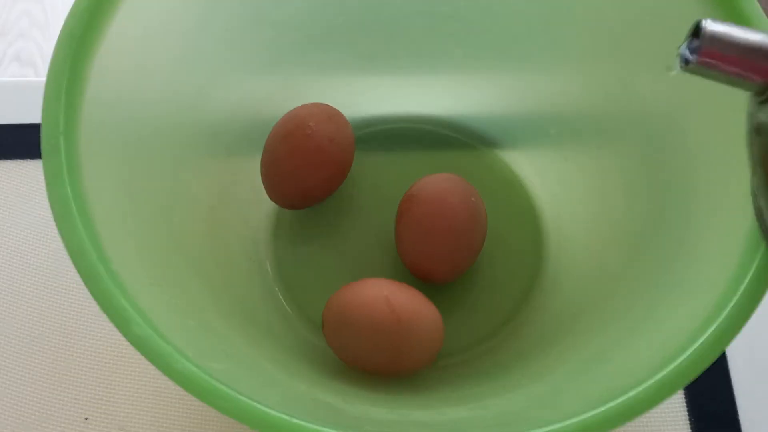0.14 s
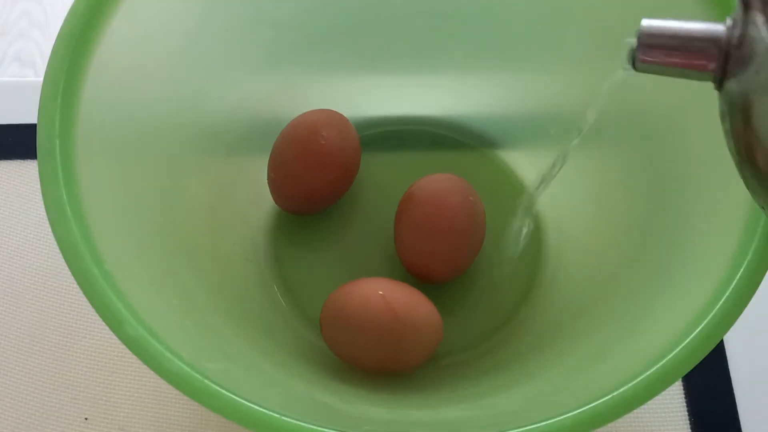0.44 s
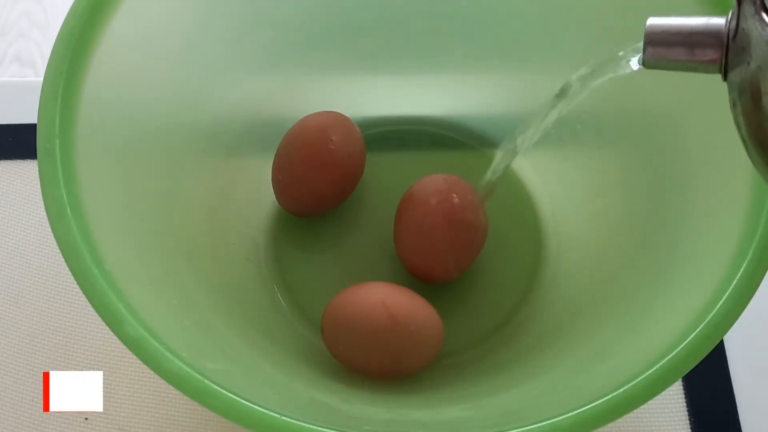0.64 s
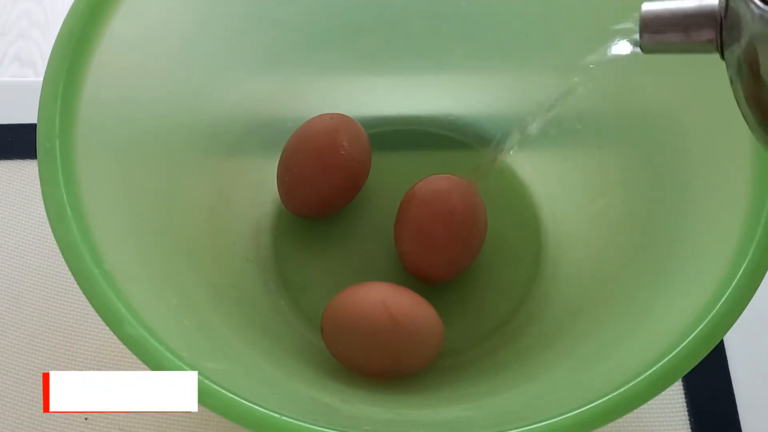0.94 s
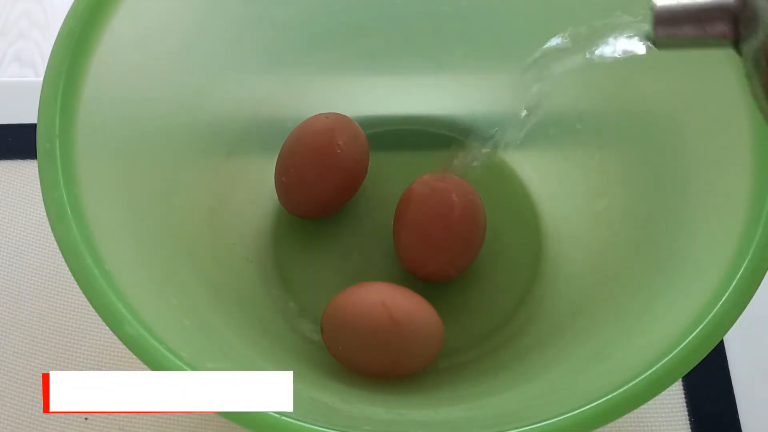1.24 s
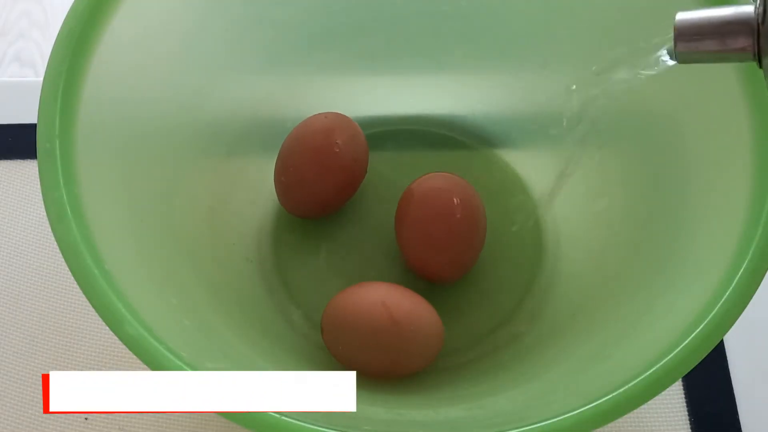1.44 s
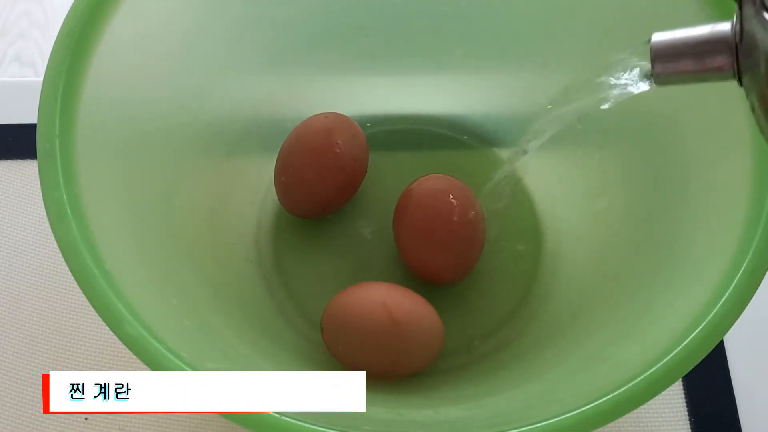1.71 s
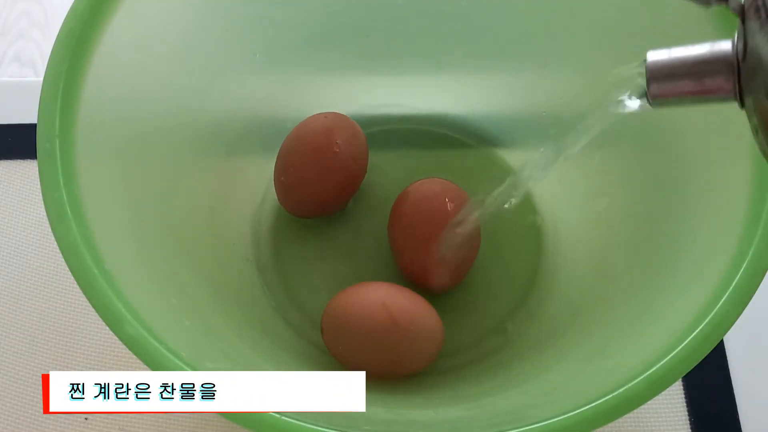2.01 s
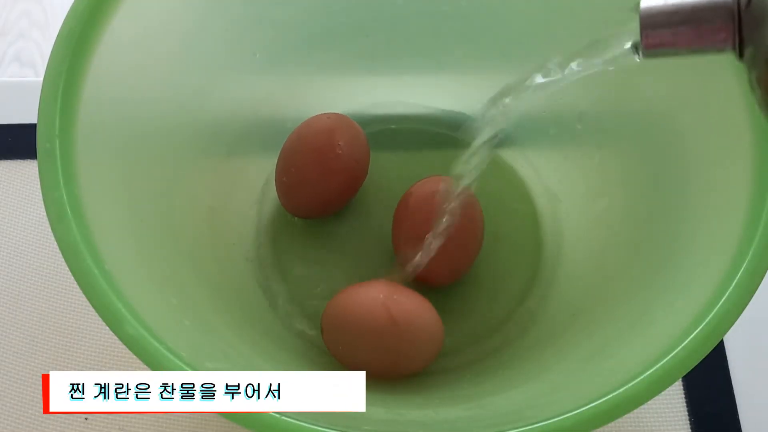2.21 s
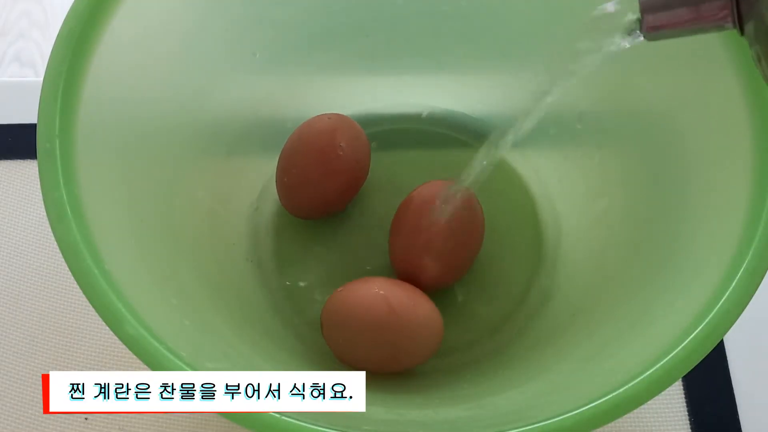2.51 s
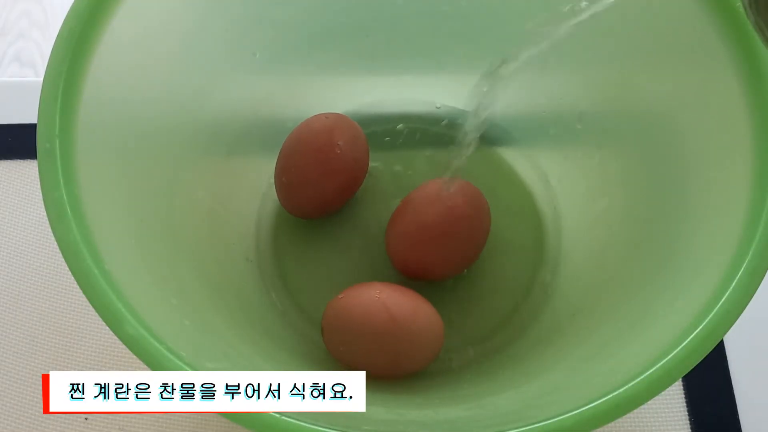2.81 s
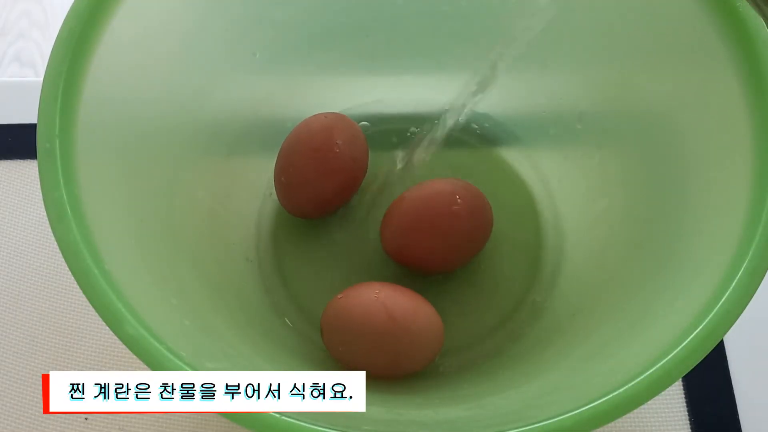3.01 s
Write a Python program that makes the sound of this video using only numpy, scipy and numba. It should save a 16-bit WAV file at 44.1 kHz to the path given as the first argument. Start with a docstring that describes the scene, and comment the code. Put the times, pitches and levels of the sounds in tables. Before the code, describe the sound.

After a short hard bowl knock, a thin stream of water starts, slapping eggs and plastic, with droplets, hiss and hollow bottle gulps, recorded close in a small kitchen with faint hum.

```python
"""A bowl is knocked and rattles on the counter, exciting its modes, and a low thud follows as it settles.
Then cold water is poured over eggs in the bowl: air entering the bottle gulps and glugs as rising sines.
Lumps of water slap eggs and bowl as rings with noise, droplets ring briefly and fine spray hisses between.
The pool starts to slosh as low noise. Reflections of a quiet kitchen and its hum lie under everything."""
import sys
import numpy as np
from scipy import signal
from scipy.fft import rfft, irfft
from scipy.io import wavfile
from scipy.ndimage import uniform_filter1d
from numba import njit

SR = 44100
rng = np.random.default_rng(int(sys.argv[2]) if len(sys.argv) > 2 else 0)


def digitize_waveform(pressure):
    """Quantize a signal to 16-bit integers and store it at the path in sys.argv[1].

    Rows of a 2-D input are taken as channels; values are limited to [-1, 1].
    """
    field = np.atleast_2d(pressure).T
    bounded = np.clip(field, -1, 1)
    quanta = np.round(bounded * 32767).astype(np.int16)
    wavfile.write(sys.argv[1], SR, quanta)


def ratio_of_db(decibels):
    """Turn decibels (scalar or array-like) into linear amplitude factors; 0 dB maps to 1."""
    return 10 ** (np.asarray(decibels, float) / 20)


N = 138915  # samples

# Lumps of water landing. Each row: start in seconds, level in dB, ring pitch in Hz.
SLAP_EVENTS = [(0.5342, -46, 6450), (0.681, -36.5, 2680), (0.7658, -29, 2330), (0.7795, -27, 2380),
               (1.0525, -33.5, 6470), (1.0823, -31.5, 2400), (1.258, -36.5, 3540), (1.265, -35.5, 1990),
               (1.3433, -36, 2930), (1.4204, -32.5, 6200), (1.7294, -30, 6500), (1.8892, -24, 2620),
               (1.9461, -23.5, 6170), (1.9615, -35.5, 6250), (2.0464, -26, 5800), (2.1255, -38, 2760),
               (2.163, -37.5, 2170), (2.242, -33.5, 2670), (2.2707, -31, 2830), (2.3005, -31.5, 5660),
               (2.3257, -34, 1560), (2.3519, -36.5, 2880), (2.449, -29, 2450), (2.4789, -30, 12900),
               (2.513, -39, 6300), (2.5262, -29, 3730), (2.588, -34.5, 6600), (2.62, -34, 6600),
               (2.6265, -27, 4350), (2.655, -29, 6350), (2.7082, -24.5, 2630), (2.7568, -20, 1976),
               (2.8578, -27, 6340), (2.887, -33.5, 6400), (2.9594, -24, 13000), (3.001, -35, 2950),
               (3.082, -40, 6670)]
# Flow of the stream. Each row: time in seconds, relative spray level in dB.
SPRAY_FLOW = [(.53, -73), (.6, -64.5), (.72, -54.5), (1.02, -65.5), (1.16, -51), (1.22, -61), (1.29, -47.5),
              (1.4, -62.5), (1.452, -50.5), (1.68, -58), (1.72, -47.5), (2.06, -51), (2.22, -64.5),
              (2.32, -52), (2.43, -57.5), (2.7, -52), (2.97, -50), (3.06, -51)]
# Spectrum of the spray. Each row: frequency in Hz, relative level in dB.
SPRAY_SPECTRUM = [(1300, 0.5), (2930, 8.5), (5200, 6), (6620, 13), (7400, -0.5), (9000, -65)]
# Spectrum of the treble of the spray. Each row: frequency in Hz, relative level in dB.
TREBLE_SPECTRUM = [(6800, -22), (7800, 10), (13000, 17), (15300, 10.5)]
# Treble against the spray. Each row: time in seconds, relative level in dB.
TREBLE_LEVEL = [(.6, -16), (1.35, -2.5), (1.9, -8)]
# Spectrum of the sloshing pool. Each row: frequency in Hz, relative level in dB.
SLOSH_SPECTRUM = [(35, -31), (80, 0), (220, -20), (400, 7), (886, -12), (2500, -27)]
# Bubbles of air bursting into the bottle. Each row: start in seconds, level in dB, pitch in Hz.
GLUG_EVENTS = [(0.645, -42.5, 917), (0.68, -44.5, 970), (0.691, -37, 1053), (0.809, -38.5, 1010),
               (0.924, -29.5, 1180), (0.999, -47, 658), (1.279, -52, 1050), (1.366, -41, 1080),
               (1.496, -31.5, 960), (1.581, -32.5, 1380), (1.608, -28.5, 1070), (1.695, -29.5, 1170),
               (1.74, -33.5, 1337), (1.791, -39.5, 860), (1.851, -41, 698), (2.011, -28.5, 1074),
               (2.122, -37.5, 930), (2.135, -35, 1006), (2.252, -34, 994), (2.388, -42, 740),
               (2.489, -34.5, 940), (2.595, -48, 710), (2.611, -41, 900), (2.73, -33, 860),
               (2.938, -39.5, 714), (2.989, -33.5, 1003)]
# Deep gulps in the neck of the bottle. Each row: start in seconds, level in dB.
GULP_EVENTS = [(0.384, -46), (0.686, -50), (0.891, -52), (1.23, -43), (1.479, -42.5), (1.599, -41.5),
               (1.777, -42.5), (1.889, -36.5), (2.355, -43.5), (2.48, -39.5), (2.593, -44.5),
               (2.711, -41.5), (2.892, -44)]
# Resonances of the air in the bottle. Each row: frequency in Hz, gain in dB.
BOTTLE_MODES = [(700, 15.5), (888, 7)]
# Knocks on the bowl. Each row: start in seconds, level in dB, rattle decay by 60 dB in seconds.
KNOCK_EVENTS = [(0.1627, -12.5, 0.12), (0.211, -19, 0.031), (0.218, -19.5, 0.088), (0.252, -25, 0.17),
                (0.262, -20.5, 0.05), (0.276, -33.5, 0.39)]
# Modes of bowl and counter. Each row: frequency in Hz, relative level in dB.
BOWL_MODES = [(120, -8.5), (224, -5), (441, 4), (560, 8), (790, 8.5), (888, 6), (1150, 5.5), (1500, 2.5),
              (2100, 0), (2700, -10)]
# Spectrum of the kitchen hum. Each row: frequency in Hz, relative level in dB.
KITCHEN_SPECTRUM = [(30, -10), (200, -13), (5000, -47)]

SPLIT_HZ = 4000  # divides the spray into a low and a high band
DROPS_PER_S, DROP_CYCLES = 450, 26.0  # a droplet decays by 60 dB in this many cycles
DROP_LOW_HZ, DROP_HIGH_HZ = 524, 7100
PATTER_DB = 3.5  # depth of the flicker of the spray


def unit(x):
    """Normalisation: the signal is scaled to rms 1."""
    return x / np.sqrt(np.mean(x ** 2))


def colour(x, table):
    """Linear filtering: the spectrum is weighted by a (Hz, dB) table, interpolated over log frequency."""
    hz, db = np.array(table, float).T
    f = np.arange(N // 2 + 1) * SR / N + 1e-9
    return irfft(rfft(x) * ratio_of_db(np.interp(np.log(f), np.log(hz), db)), N)


def seconds(duration):
    """Sampling: the time axis of a sound of this duration."""
    return np.arange(int(duration * SR)) / SR


def fade(t, t60):
    """Exponential decay: the amplitude falls by 60 dB in t60 seconds."""
    return np.exp(-np.log(1000) * t / max(t60, 1e-3))


def add(out, s, x):
    """Superposition: x is mixed in at time s."""
    i = int(s * SR)
    out[..., i:i + x.shape[-1]] += x[..., :N - i]


def resonate(x, hz, q):
    """Resonance: a single peak of quality q passes the band about hz."""
    return signal.lfilter(*signal.iirpeak(hz, q, fs=SR), x)


def flicker(rate, db):
    """Random modulation: a gain that wanders by about db, with new targets at the given rate a second."""
    k = int(SR / rate)
    steps = np.repeat(rng.standard_normal(N // k + 1), k)
    # the smoothing lowers the spread, 1.3 restores it
    return ratio_of_db(db * 1.3 * uniform_filter1d(steps, k)[:N])


def bubble(hz, t60, rise, glide):
    """Bubble oscillation: a sine that swells and dies under an envelope of peak 1, its pitch rising by glide."""
    t = seconds(.2)
    env = (1 - np.exp(-(t / rise) ** 2)) * fade(t, t60)
    cycles = hz * (t * (1 - glide / 2) + glide * t ** 2 / (rise + t60 / 2))
    return env / env.max() * np.sin(2 * np.pi * cycles)


def wide(x, y):
    """Decorrelation: the channels share x, and its unrelated twin y sets them apart, least in the bass."""
    side = colour(y, [(200, -15), (1200, -2)])
    return np.array([x + side, x - side])


def hiss(table, env):
    """Turbulent noise: coloured stereo noise follows an envelope."""
    twins = [env * unit(colour(rng.standard_normal(N), table)) for _ in range(2)]
    return wide(*twins)


def slaps():
    """Impact on water: each lump excites a rising ring and noise about the same pitch."""
    t, out = seconds(.2), np.zeros((2, N))
    for s, db, hz in SLAP_EVENTS:
        splash = unit(resonate(rng.standard_normal((2, len(t))), hz, 4.0))
        ring = bubble(hz, 20.3 / hz, 0.00066, 0.027)  # decays by 60 dB in 20.3 cycles
        pan_db = 2 * rng.standard_normal() * np.array([[1], [-1]])
        add(out, s, ratio_of_db(db + pan_db) * (ring + ratio_of_db(-9.5) * splash * fade(t, 0.081)))
    return out


def spray_envelopes():
    """Amplitude envelopes: the spray below and above SPLIT_HZ follows the flow, and each slap throws up more."""
    t = seconds(.2)
    base = ratio_of_db(np.interp(np.arange(N) / SR, *np.array(SPRAY_FLOW).T, left=-120))
    env = np.array([base, base])
    for s, db, hz in SLAP_EVENTS:
        # a low slap throws less high spray, a high slap less low spray
        tilt_db = 5.8 * np.clip(np.log2(hz / SPLIT_HZ), -1, 1) * np.array([[-1], [1]])
        burst = fade(t, 0.092) * np.tanh(t / 0.001)
        add(env, s, ratio_of_db(db - 13 + np.minimum(tilt_db, 0)) * burst)
    return env


@njit
def plinks(at, hz, size, pan, cycles, glide):
    """Damped oscillation: each droplet is a short ring of rising pitch, placed left or right."""
    out = np.zeros((2, N))
    for k in range(len(at)):
        z = size[k] + 0j
        w = 2 * np.pi * hz[k] / SR
        d = np.exp(-np.log(1000.) * hz[k] / cycles / SR)
        for i in range(at[k], min(N, at[k] + int(cycles * SR / hz[k]))):
            z *= d * np.exp(1j * w)
            w *= 1 + glide * hz[k] / cycles / SR
            out[0, i] += z.imag * (1 - pan[k])
            out[1, i] += z.imag * (1 + pan[k])
    return out


def droplets(env, slap):
    """Random superposition: droplets ring at random times; with the slaps they excite the wet bowl."""
    when, pitch, luck, side = rng.random((int(DROPS_PER_S * N / SR), 4)).T
    at = (when * N).astype(int)
    hz = DROP_LOW_HZ * (DROP_HIGH_HZ / DROP_LOW_HZ) ** pitch
    spread = ratio_of_db(-5.5 * np.log(luck + 0.09))  # few large droplets, many small
    size = spread * env[(hz > SPLIT_HZ).astype(int), at]
    drops = plinks(at, hz, size, .7 * (2 * side - 1), DROP_CYCLES, .4)
    drops = signal.lfilter(*signal.butter(2, DROP_LOW_HZ, "high", fs=SR), drops)
    bowl_ring = ratio_of_db(6) * resonate(drops + slap, 2885, 40)
    return ratio_of_db(1) * (drops + bowl_ring)


def spray(env):
    """Band-limited noise: fine spray hisses in two bands, with a flickering treble on top."""
    out = np.zeros((2, N))
    for band, kind in zip(env, ("low", "high")):
        noise = hiss(SPRAY_SPECTRUM, band * flicker(150, PATTER_DB))
        out += ratio_of_db(-3.5) * signal.lfilter(*signal.butter(2, SPLIT_HZ, kind, fs=SR), noise)
    treble = ratio_of_db(np.interp(np.arange(N) / SR, *np.array(TREBLE_LEVEL).T)) * env[1]
    return out + hiss(TREBLE_SPECTRUM, treble * flicker(220, PATTER_DB))


def slosh():
    """Modulated low noise: the pool starts to slosh between 0.59 and 0.67 s."""
    level = ratio_of_db(-58.5) * np.interp(np.arange(N) / SR, (0.59, 0.67), (0, 1))
    return hiss(SLOSH_SPECTRUM, level * flicker(30.12, 5.1))


def stream():
    """Superposition: slaps, droplets, spray and slosh make up the falling water."""
    slap, env = slaps(), spray_envelopes()
    return slap + droplets(env, slap) + spray(env) + slosh()


def bottle():
    """Cavity resonance: glugs and gulps of entering air excite the air in the bottle."""
    out = np.zeros(N)
    for s, db, hz in GLUG_EVENTS:
        add(out, s, ratio_of_db(db) * bubble(hz, t60=0.031, rise=0.001, glide=0.042))
    for s, db in GULP_EVENTS:
        hz = 448 * rng.uniform(.9, 1.04)
        add(out, s, ratio_of_db(db) * bubble(hz, t60=0.123, rise=0.0056, glide=0.15))
    out = out * flicker(130, 1.63)  # the water shakes them
    ringing = sum(ratio_of_db(db) * resonate(out, hz, hz / 30) for hz, db in BOTTLE_MODES)  # 30 Hz wide
    pan_db = 1.5 * np.array([[-1], [1]])  # the bottle is to the right
    return (out + ringing) * ratio_of_db(pan_db)


def bowl_ring(t):
    """Modal synthesis: decaying sines of alternating sign, the higher modes dying sooner."""
    ring = np.zeros(len(t))
    for k, (hz, db) in enumerate(BOWL_MODES):
        t60 = 0.022 * np.sqrt(500 / hz)
        ring += (-1) ** k * ratio_of_db(db) * np.sin(2 * np.pi * hz * t) * fade(t, t60)
    return ring / np.abs(ring).max()


def knocks():
    """Impulse excitation: pushes and rough rattles ring the modes; the rattles and first blow also crack."""
    t, push, grit = seconds(.4), np.zeros(N), np.zeros(N)
    for k, (s, db, t60) in enumerate(KNOCK_EVENTS):
        rattle = 0.081 * rng.standard_normal(len(t)) * fade(t, t60)
        blow = (t == 0)
        add(grit, s, ratio_of_db(db) * (rattle + blow * (k == 0)))
        add(push, s, ratio_of_db(db) * (rattle + blow))
    crack = colour(grit, [(2500, 8), (4330, 0), (7000, -3), (8000, -9)])
    out = signal.fftconvolve(push, bowl_ring(t))[:N] + ratio_of_db(-4) * crack
    # the counter thuds as the bowl settles
    add(out, .29, ratio_of_db(-42) * bubble(73.6, t60=0.24, rise=0.0045, glide=0))
    return out


def room(x, db):
    """Reverberation: a mono sound meets a separate decaying noise tail in each channel, after 4 ms."""
    t = seconds(.6)
    tail = rng.standard_normal((2, len(t))) * (t > .004) * fade(t, 0.17)
    tail = tail / np.sqrt(np.sum(tail ** 2, axis=1, keepdims=True))
    return ratio_of_db(db) * signal.fftconvolve(np.broadcast_to(x, (2, N)), tail, axes=1)[:, :N]


def kitchen():
    """Stationary noise: the quiet hum of the kitchen, strongest in the bass."""
    return hiss(KITCHEN_SPECTRUM, ratio_of_db(-71))


def scene():
    """Superposition: direct sounds, their reflections in the kitchen and its hum."""
    water, knock = stream() + bottle(), knocks()
    echo = room(water.mean(axis=0), -5) + room(knock, -2)
    return water + knock + echo + kitchen()


def low_pass(x):
    """Removes everything above the highest recorded frequency."""
    return signal.sosfilt(signal.butter(12, 16970, fs=SR, output="sos"), x)


def record(dry):
    """Band limitation: the deepest bass and everything above about 16 kHz are filtered out."""
    dull = colour(dry, [(15800, 0), (16200, -34)])
    mix = signal.lfilter(*signal.butter(2, 50, "high", fs=SR), dull)
    return low_pass(mix)


dry = scene()
out = record(dry)
digitize_waveform(out)
```